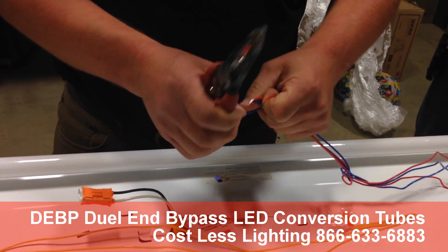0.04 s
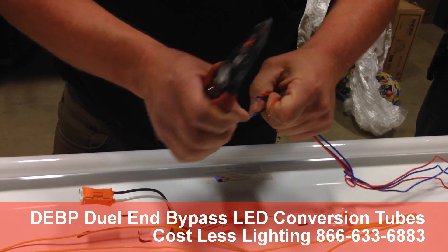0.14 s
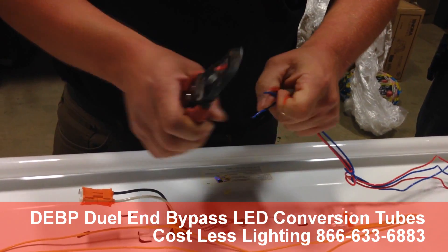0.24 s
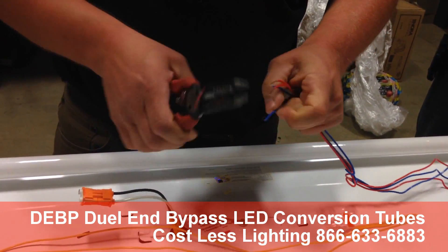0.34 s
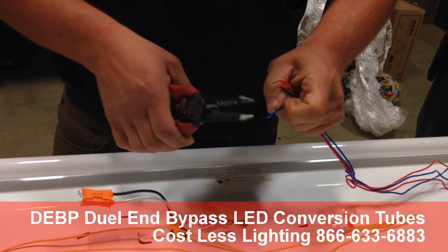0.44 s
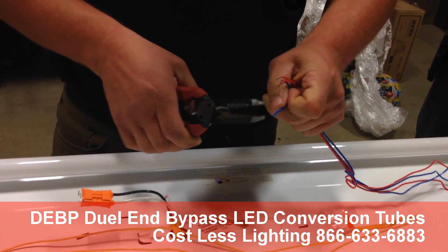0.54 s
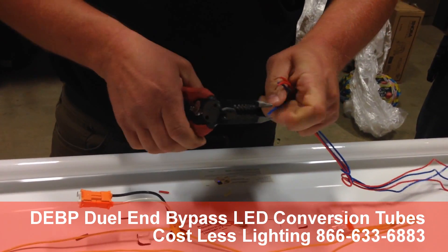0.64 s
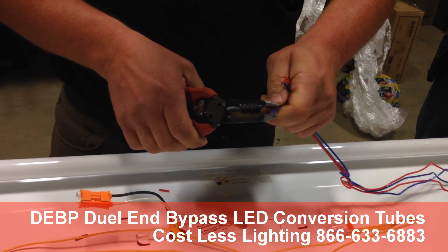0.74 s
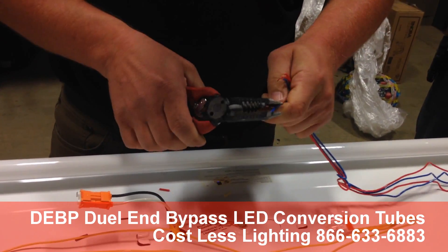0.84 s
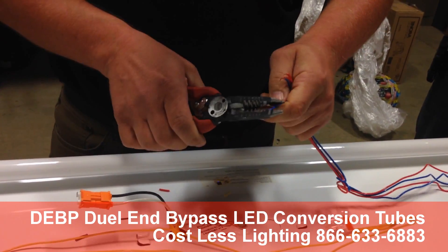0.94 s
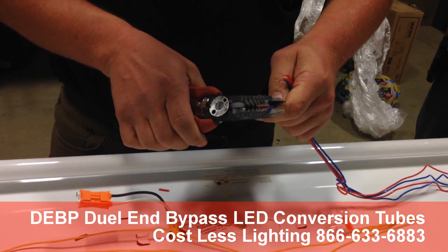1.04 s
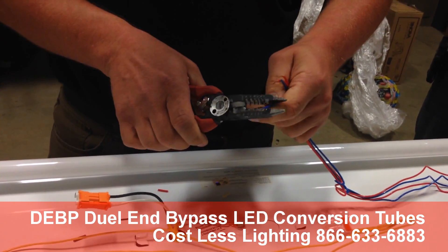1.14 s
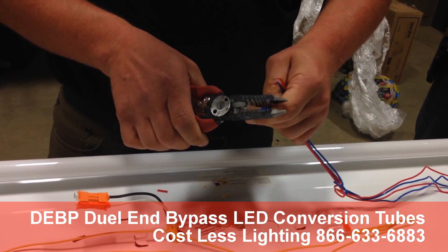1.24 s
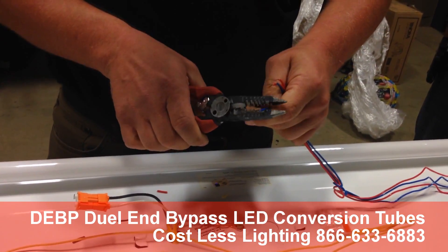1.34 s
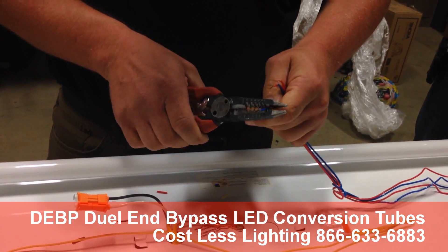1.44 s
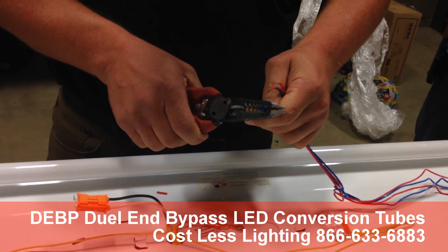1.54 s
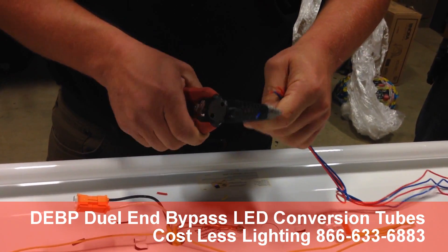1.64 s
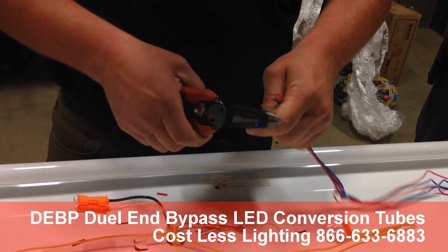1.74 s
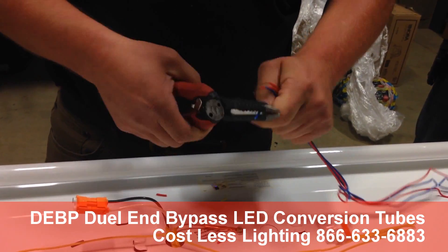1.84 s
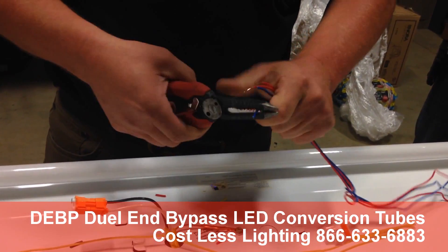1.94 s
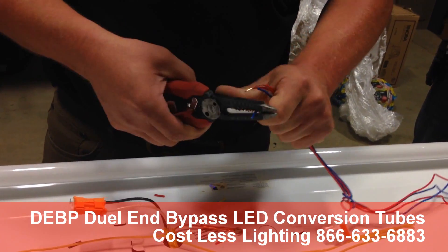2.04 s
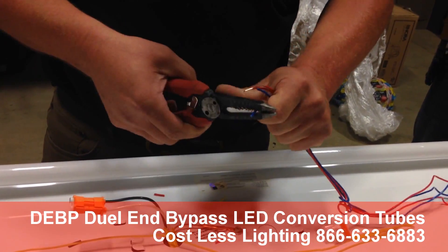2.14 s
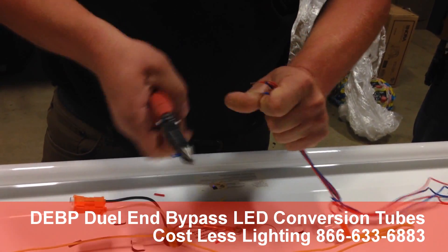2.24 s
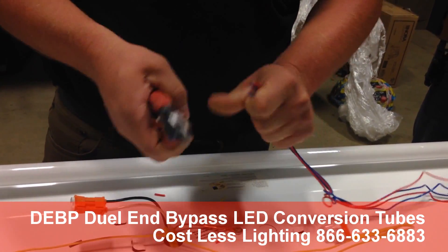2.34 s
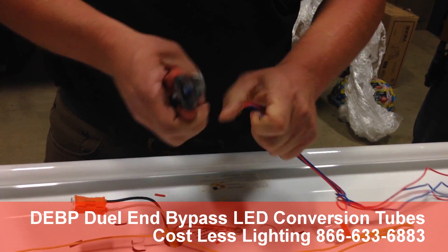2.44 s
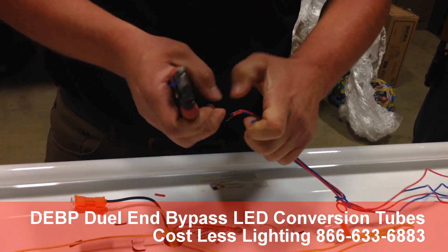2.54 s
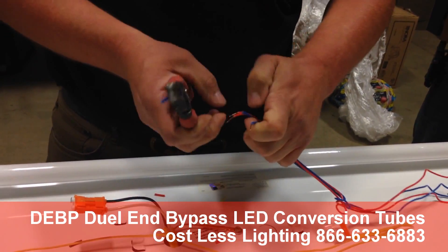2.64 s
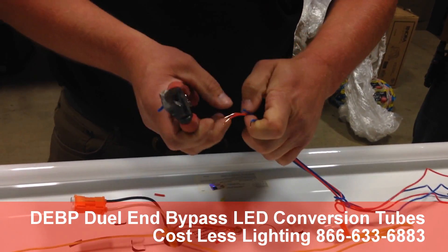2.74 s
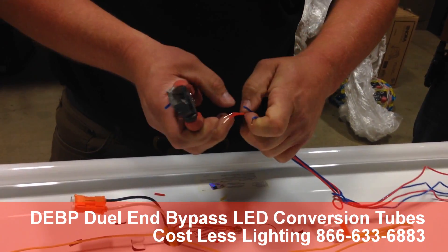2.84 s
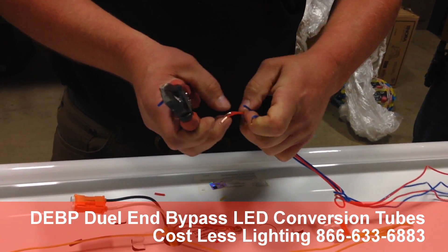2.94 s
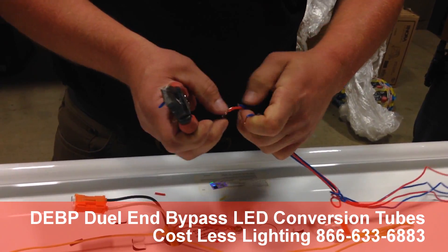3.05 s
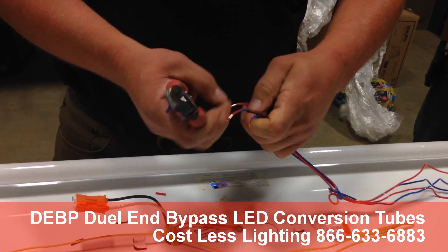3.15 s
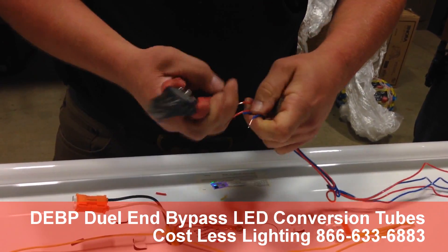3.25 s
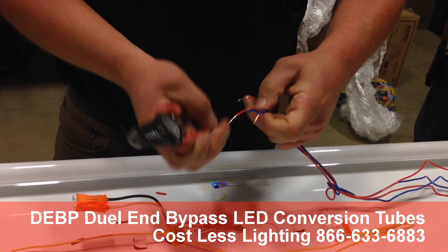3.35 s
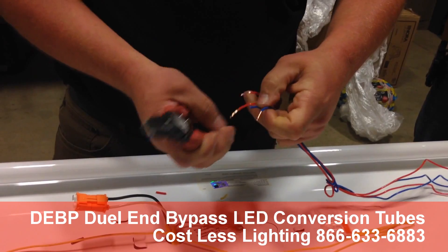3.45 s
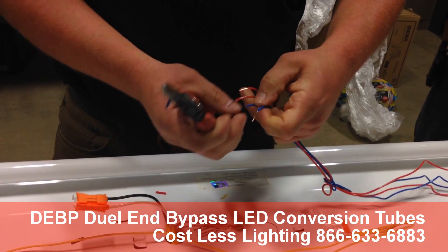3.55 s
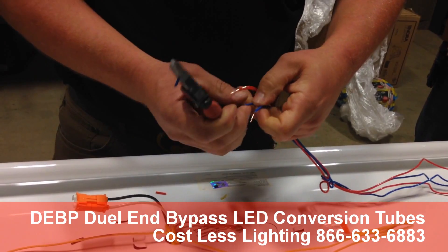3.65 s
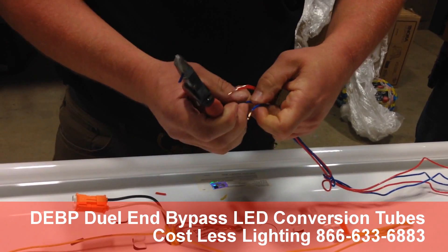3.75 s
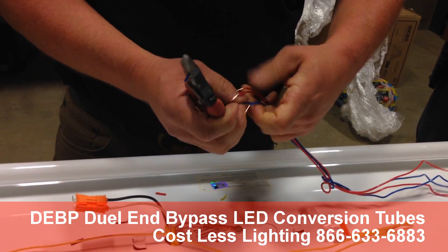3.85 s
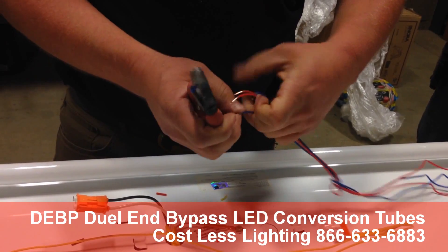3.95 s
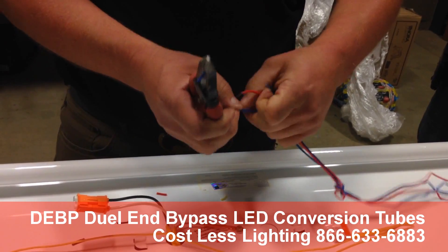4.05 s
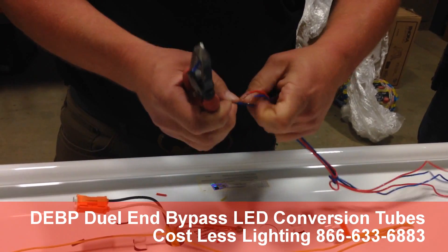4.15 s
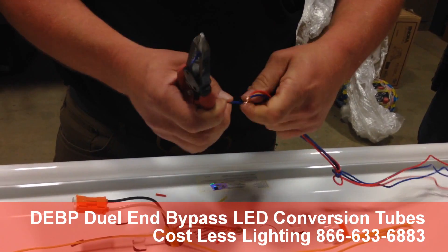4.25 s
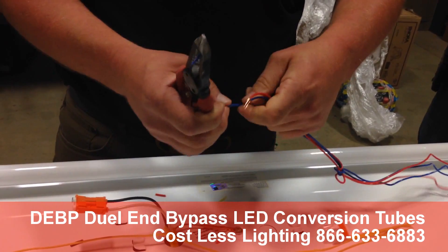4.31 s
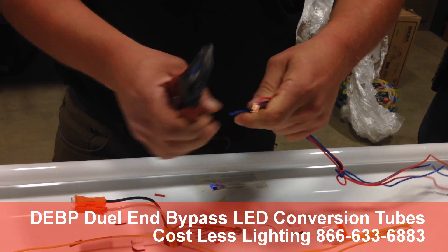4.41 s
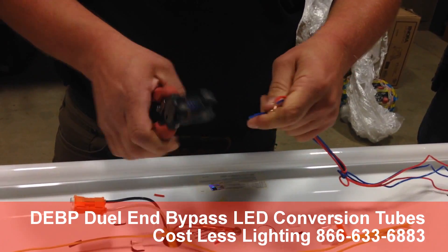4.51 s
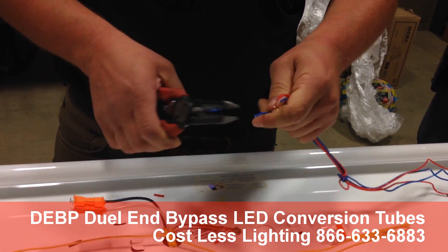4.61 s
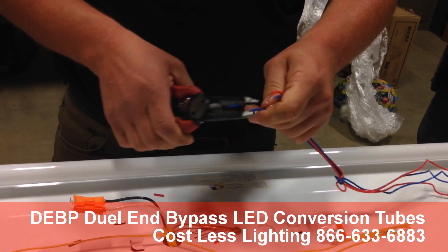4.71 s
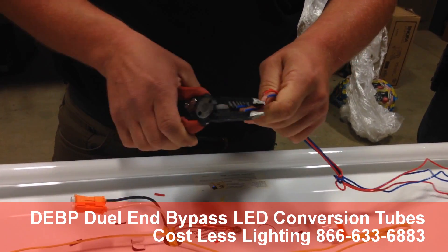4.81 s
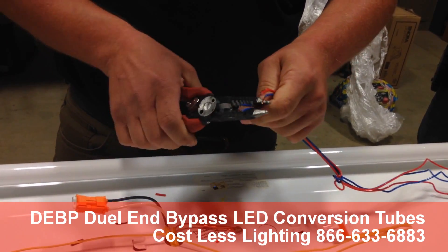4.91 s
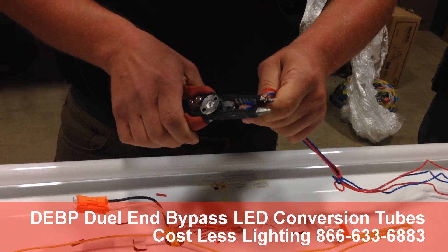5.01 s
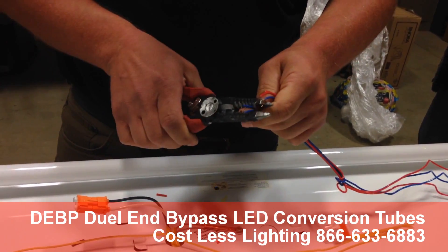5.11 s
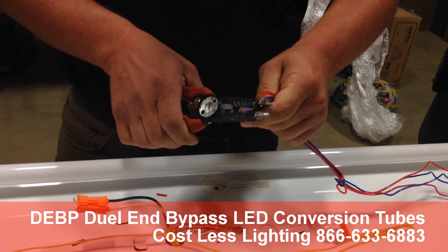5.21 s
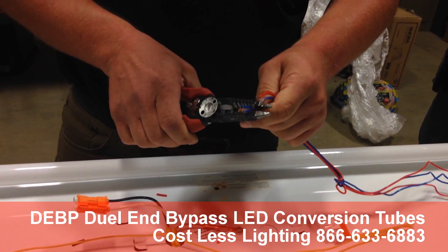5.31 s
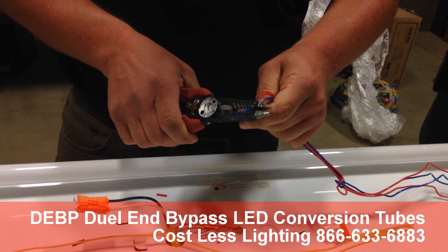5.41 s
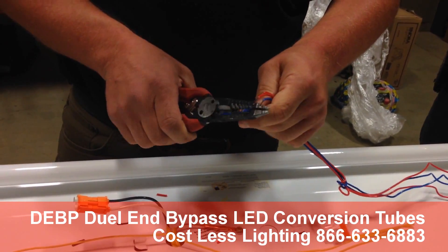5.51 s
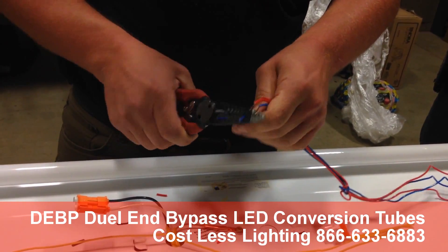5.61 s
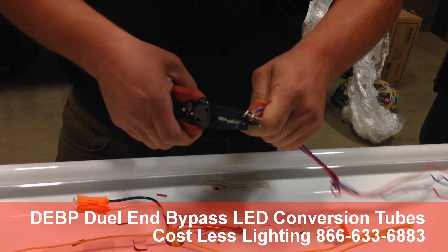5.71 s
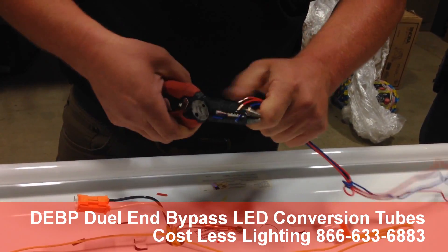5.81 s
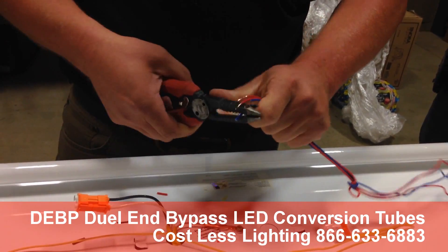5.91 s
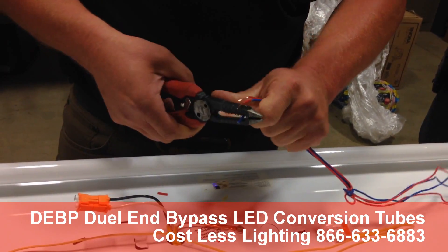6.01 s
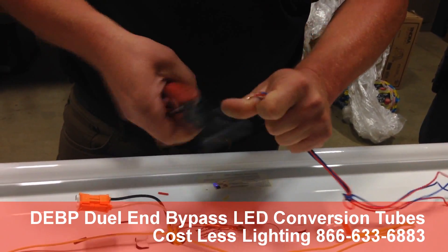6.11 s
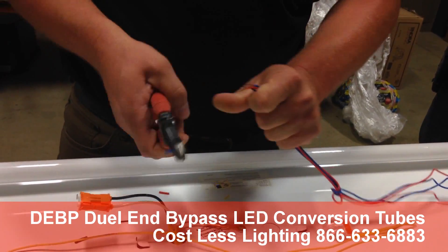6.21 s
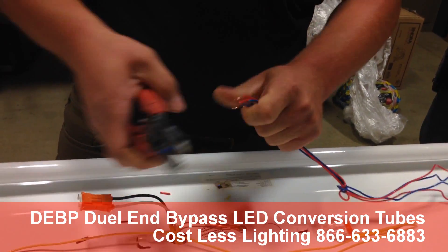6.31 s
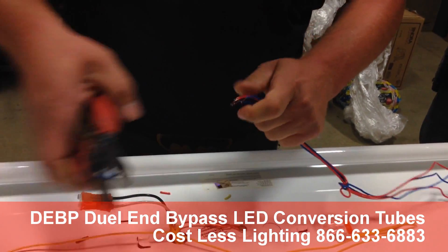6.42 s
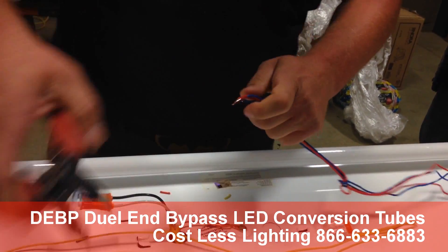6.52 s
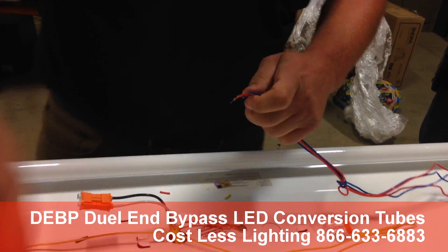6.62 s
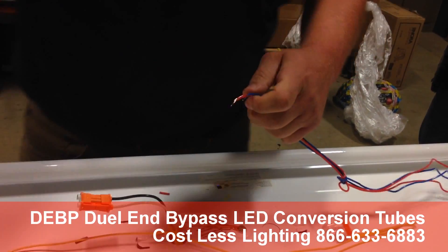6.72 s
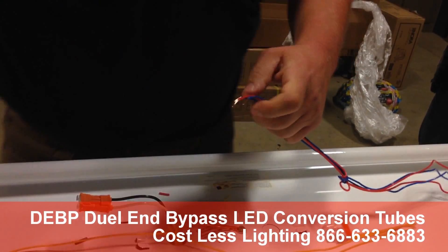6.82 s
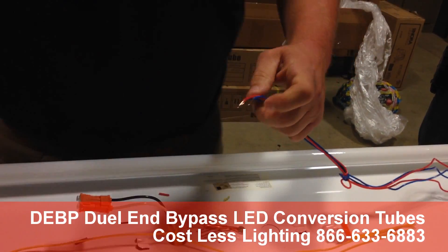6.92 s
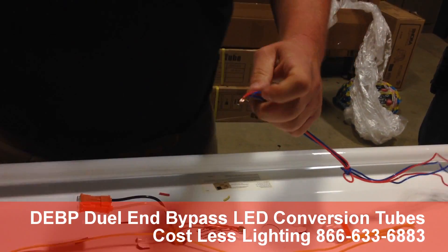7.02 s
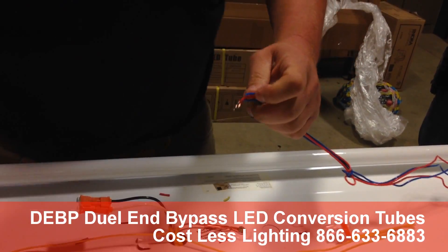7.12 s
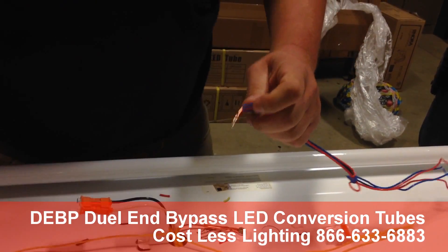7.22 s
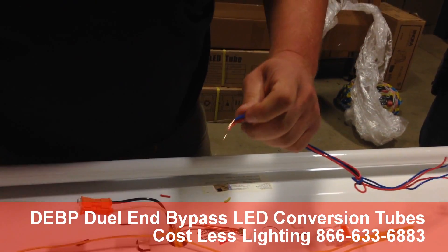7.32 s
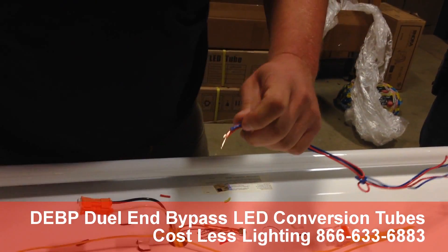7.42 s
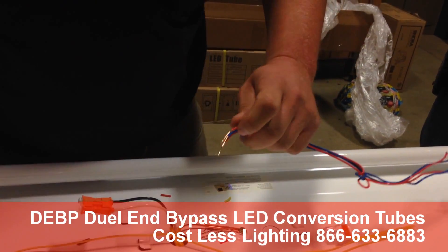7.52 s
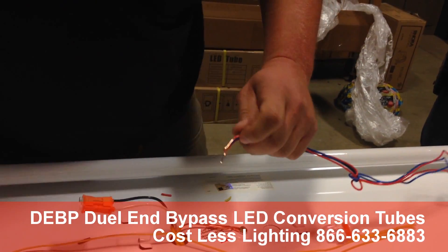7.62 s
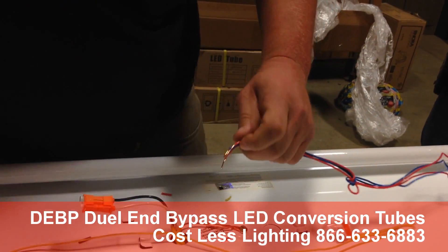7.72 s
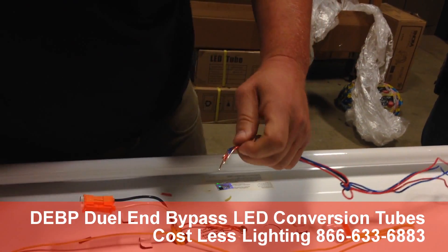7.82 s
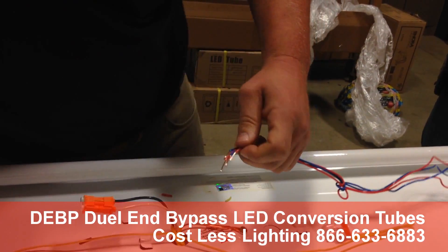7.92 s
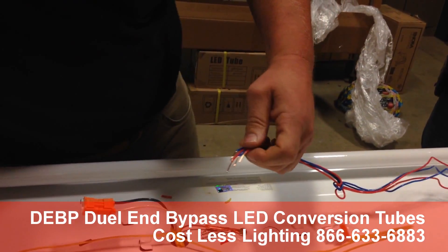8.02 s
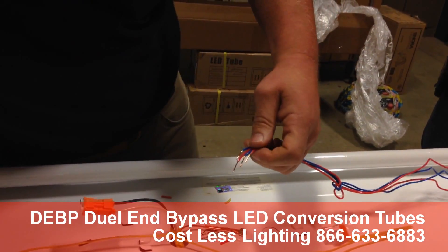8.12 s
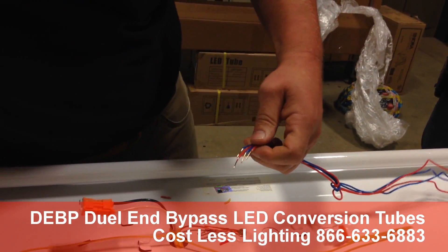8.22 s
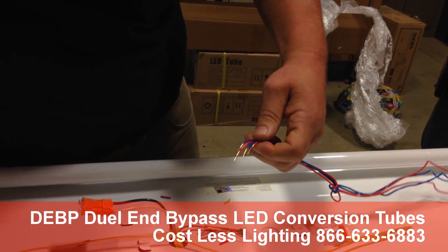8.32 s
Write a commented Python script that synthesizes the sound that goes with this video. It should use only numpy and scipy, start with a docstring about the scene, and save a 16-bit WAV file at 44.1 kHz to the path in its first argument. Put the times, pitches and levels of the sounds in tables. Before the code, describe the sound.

In a quiet store room with a short echo, irregular tool snaps alternate with near-silent handling. Two stripping actions each finish in a hard crack, a rattle and a dull boom of thin sheet metal. Wire ends brush and tick on the sheet. A brief shuffle of steps leads to a heavy woody clatter as the tool is put down, then sparse ticks and a final cluster of snaps, closely miked over faint air noise and hiss.

```python
"""Small ticks, rattles and hard snaps of hand wire strippers ring over a sheet-metal lamp housing in a store room.
Wire ends scrape the sheet, which booms when pushed; later steps rumble and the tool knocks on a wooden bench.
Ticks, rattles, snaps and cracks are shaped noise bursts; booms and knocks use fading sine waves.
Scrapes and steps are noise with a changing level. Ventilation noise, mains hum and microphone hiss run throughout."""
import sys
import numpy as np
from scipy import signal
from scipy.fft import rfft, irfft, next_fast_len
from scipy.io import wavfile
from scipy.ndimage import map_coordinates

SR = 44100
rng = np.random.default_rng(int(sys.argv[2]) if len(sys.argv) > 2 else 0)


def store_pcm(level_fs):
    """Save levels as 16-bit WAV."""
    pcm = np.round(np.clip(level_fs, -1, 1) * 32767).astype(np.int16)
    wavfile.write(sys.argv[1], SR, np.atleast_2d(pcm).T)


N = 368676


def amp(db):
    """Turn a level in dB into a gain."""
    return 10 ** (np.asarray(db) / 20)


def unit(x):
    """Scale x to rms 1."""
    return x / np.sqrt(np.mean(x ** 2) + 1e-20)


def along(points, hz):
    """Read a (frequency [Hz], value) table with straight lines on a log frequency axis."""
    f, value = np.transpose(points)
    return np.interp(np.log(hz + 1), np.log(f + 1), value)


def gain_curve(rows):
    """Turn a (time [s], level [dB]) table into a gain per sample, practically silent outside it."""
    s, db = np.transpose(rows)
    return amp(np.interp(np.arange(N) / SR, s, db, left=-200, right=-200))


def wobble(rate):
    """Draw a smooth random curve through `rate` random points a second."""
    points = rng.standard_normal(int(N * rate / SR) + 4)
    return map_coordinates(points, [np.arange(N) * rate / SR])


def filtered(x, response):
    """Filter x by multiplying its spectrum with a complex response of frequency."""
    n = x.shape[-1]
    m = next_fast_len(n + 8192)  # spare room for the filter to ring out
    spectrum = rfft(x, m) * response(np.fft.rfftfreq(m, 1 / SR))
    return irfft(spectrum, m)[..., :n]


def noise(colour):
    """Make steady noise of rms 1 whose spectrum follows a colour table."""
    white = rng.standard_normal(N)
    return unit(filtered(white, lambda hz: amp(along(colour, hz))))


def band(x, lo_hz, hi_hz):
    """Causal band-pass; white noise of rms 1 stays near rms 1."""
    sos = signal.butter(2, [lo_hz, hi_hz], "bandpass", fs=SR, output="sos")
    return signal.sosfilt(sos, x) * np.sqrt(SR / 2 / (hi_hz - lo_hz))


def resonance(hz, centre_hz, width_hz):
    """Response of one damped vibration: a causal peak of gain 1."""
    return 1j * hz * width_hz / (centre_hz ** 2 - hz * hz + 1j * hz * width_hz)


def place(times, sounds):
    """Add each row of sounds at its start time."""
    out = np.zeros(N + sounds.shape[1])
    for s, sound in zip(times, sounds):
        out[round(s * SR):][:len(sound)] += sound
    return out[:N]


def background():
    """Ventilation is coloured noise whose level flutters; the mains hum is a sine that wavers."""
    # ventilation spectrum: (frequency [Hz], relative level [dB per Hz])
    air_colour = [(15, -58.5), (25, -23.5), (36, -13), (64, 2), (122, -2.5), (192, -8), (308, -14.5),
                  (386, -16.5), (447, -19.5), (1200, -27.5), (1560, -79.5), (2640, -120)]
    # mains hum: (frequency [Hz], middle rms level [dB])
    hum_tones = [(119.5, -70.5)]
    t = np.arange(N) / SR
    air_db = -65 + 0.18 * wobble(22.0) + 0.86 * wobble(28)
    air = amp(air_db) * noise(air_colour)
    hum = np.zeros(N)
    for hz, db in hum_tones:
        level = np.sqrt(2) * amp(db + 1.4 * wobble(46))  # root 2 turns rms into peak
        hum += level * np.sin(2 * np.pi * hz * t + 0.39 * wobble(0.87))
    return air + hum


def housing(hz):
    """Response of the metal sheet: a few resonances added with alternating signs."""
    # sheet resonances: (centre [Hz], width [Hz], gain [dB])
    sheet_modes = [(2020, 720, -3.5), (3264, 240, 8.5), (3700, 950, -4.5)]
    total = 0
    for k, (centre_hz, width_hz, db) in enumerate(sheet_modes):
        total = total + (-1) ** k * amp(db) * resonance(hz, centre_hz, width_hz)
    return total


def ticks():
    """Offcuts and wire ends give a short click that rings one narrow resonance and the sheet below."""
    # ticks, starting 1 ms before the time: (time [s], level [dB], ring [Hz], 60 dB fade of the noise [s])
    tick_rows = [(0.0508, -55.5, 3200, 0.13), (0.2096, -59, 3260, 0.093), (0.3524, -37, 5200, 0.037),
                 (0.4234, -65, 2530, .035), (1.154, -60, 3060, 0.083), (2.3439, -42, 3200, 0.13),
                 (2.5005, -48, 2090, 0.11), (2.5596, -40.5, 3220, 0.15), (2.7637, -47, 6500, 0.041),
                 (4.013, -60, 3250, 0.072), (4.1682, -45, 2540, 0.065), (4.2314, -49, 2140, .07),
                 (4.2946, -41, 3256, 0.16), (4.391, -58, 3270, 0.065), (4.4685, -52, 3270, 0.045),
                 (4.56, -57, 2300, 0.076), (5.249, -64, 3400, 0.077), (5.7675, -63, 5840, 0.044),
                 (5.924, -55.5, 3180, 0.078), (5.9646, -52.5, 3170, 0.18), (6.0637, -51.5, 3400, 0.12),
                 (6.317, -45, 3150, 0.053), (6.35, -44.5, 3100, .1), (6.427, -46.5, 2020, 0.068),
                 (6.499, -51, 3080, 0.11), (6.547, -60.5, 3250, 0.079), (6.639, -56.5, 3160, 0.086),
                 (6.684, -52, 3200, .05), (6.8154, -52.5, 3120, 0.084), (6.893, -59, 3100, .07),
                 (6.986, -59.5, 2420, 0.3), (7.2638, -45.5, 4240, 0.031), (7.529, -52, 3170, 0.18),
                 (7.648, -56, 3170, .07), (7.9965, -56, 3010, 0.15), (8.103, -53, 5900, 0.061),
                 (8.2185, -56, 3170, 0.16), (8.2679, -42.5, 1820, 0.088)]
    s, db, hz, t60 = np.transpose(tick_rows)[:, :, None]
    t = np.arange(SR // 6) / SR
    grit = rng.standard_normal((len(s), len(t)))
    grit = grit * amp(-60 * t / t60) * (1 - np.exp(-t / 0.00011))
    width_hz = .16 * hz * (hz / 3200) ** .8  # higher rings are wider
    ring = amp(15) * filtered(grit, lambda f: resonance(f, hz, width_hz) ** 2)
    click = band(grit * amp(-60 * t / 0.093), 1200, 6700)
    click = click + amp(10.5) * filtered(grit, housing)
    return place(s[:, 0] - .001, amp(db) * (ring + amp(-7.5) * click))


def room(x):
    """Diffuse echo: each third of a second gets a new noise tail; each frequency dies at its own speed."""
    # room echo: (frequency [Hz], 60 dB fade [s])
    echo_times = [(100, 0.62), (500, 0.63), (2000, 0.32), (6000, 0.15), (14000, 0.18)]
    hop = SR // 3
    parts = np.pad(x, (0, -N % hop)).reshape(-1, hop)
    hz, t, z = signal.stft(rng.standard_normal((len(parts), SR // 2)), SR, nperseg=256)
    fade = amp(-60 * t / along(echo_times, hz)[:, None])
    tails = signal.istft(z * fade, SR, nperseg=256)[1]
    tails = tails / np.linalg.norm(tails, axis=1, keepdims=True)
    starts = np.arange(len(parts)) * hop / SR + 0.0073  # the echo starts 7.3 ms late
    return place(starts, signal.fftconvolve(parts, tails, axes=1))


def burst(rows, width, body_db, t60, rise, grit_db):
    """Gritty noise dying away, its treble first, around one broad resonance with a low and a high shoulder."""
    s, db, hz, treble_db = np.transpose(rows)[:, :, None]
    t = np.arange(SR // 3) / SR
    # the grit takes a new random level every 30 samples
    grit_levels = rng.standard_normal((len(s), len(t) // 30)).repeat(30, axis=1)
    grit = rng.standard_normal((len(s), len(t))) * amp(grit_db * grit_levels)
    hold_s = 0.009  # the fade starts after this time

    def fade(speed):
        """Let the grit build up, then die away; higher speeds die sooner."""
        return grit * (1 - np.exp(-t / rise)) * amp(-60 * speed * np.maximum(t - hold_s, 0) / t60)

    width_hz = hz * width

    def centre_response(f):
        """Double resonance with its far treble softened."""
        return resonance(f, hz, width_hz) ** 2 / (1 + 1j * f / (4.8 * hz)) ** 2

    centre = filtered(fade(0.91), centre_response) * np.sqrt(SR / width_hz / 2)
    body = amp(body_db) * band(fade(0.49), 830, 1550)
    treble = amp(treble_db) * band(fade(1.7), 4600, 12000)
    return place(s[:, 0] - .001, amp(db) * (centre + body + treble))  # starts 1 ms before the table time


def rattles():
    """Many small contacts of wires and handles, heard as noise building up over a few milliseconds."""
    # soft-starting rattles: (time [s], level [dB], centre [Hz], treble [dB])
    rattle_rows = [(0.394, -45.5, 2830, 1.5), (0.7154, -51, 4870, 0.5), (0.7548, -58, 5470, -9),
                   (0.9507, -60, 3100, -1), (1.6257, -56, 2100, -0.5), (1.6508, -63.5, 2350, 3),
                   (1.865, -55.5, 3000, -33), (2.0487, -63.5, 2440, -17), (2.1784, -58.5, 2720, -28),
                   (2.3094, -45, 2420, -9), (2.3745, -48.5, 2270, -2.5), (2.4023, -48, 3050, -30),
                   (2.4274, -64, 3080, -9), (2.72, -64.5, 2080, -17), (3.422, -63.5, 3200, 0),
                   (4.2468, -50, 2470, -29), (4.3185, -53.5, 2470, -2), (6.1974, -37, 2920, 1.5),
                   (6.22, -45, 2350, 10), (6.2791, -44, 2930, -22), (6.3695, -50.5, 2850, -31),
                   (7.034, -28, 4810, -44), (7.0556, -34, 3940, -22), (8.0605, -50, 3900, -7.5)]
    # width is relative to the centre; t60 [s] is the fade at speed 1; rise is in seconds
    return burst(rattle_rows, width=1.86, body_db=-16.5, t60=0.12, rise=0.0064, grit_db=4.5)


def snaps():
    """A hard contact of jaws and wire, then the dense reflections of sheet and bench, as one noise burst."""
    # hard snaps: (time [s], level [dB], centre [Hz], treble [dB])
    snap_rows = [(0.5654, -31.5, 4100, 0.5), (0.651, -40.5, 5040, -28), (0.8582, -44.5, 3450, -9),
                 (1.7888, -40, 3600, -45), (1.9752, -41.5, 2720, -10), (2.2871, -34.5, 3000, -25),
                 (2.574, -42, 2530, -44), (3.1657, -45.5, 2600, -17), (4.0445, -36, 3600, -46),
                 (4.0753, -40, 2830, -34), (4.135, -31.5, 3100, -51), (5.7347, -51, 2310, -10),
                 (5.8522, -45.5, 2900, -14), (6.0916, -28, 4244, -2.5), (8.0359, -36, 1963, -8.5),
                 (8.2901, -33, 2270, -41), (8.3174, -38.5, 1710, -22)]
    # same units as the rattles; quicker start, wider band, weaker body, faster fade, less grit
    return burst(snap_rows, width=2.1, body_db=-26.5, t60=0.11, rise=.0015, grit_db=2)


def scrape():
    """Friction hisses in uneven grains; sparse snags of the wire ends ring the sheet."""
    # wires dragging over the sheet, one list per drag: (time [s], level before mixing [dB])
    drags = [
        [(2.27, -60), (2.454, -55), (2.7, -70)],
        [(3.18, -76), (3.3, -62.5), (3.39, -74)],
        [(4.1, -62), (4.21, -51.5), (4.45, -72.5)],
        [(6.2, -54), (6.85, -66), (7.0, -64)],
        [(7.25, -82), (7.334, -63.5), (7.5, -77.5)],
    ]
    # friction spectrum: (frequency [Hz], relative level [dB per Hz])
    rub_colour = [(150, -43), (330, 7), (480, -19), (800, 4), (1560, -6), (3190, -1.5), (9000, -8),
                  (15000, -50)]
    snags_per_s = 220  # on average
    grain = amp(1.5 * wobble(250) + 2.2 * wobble(40))
    drag = sum(gain_curve(rows) for rows in drags)
    rub = drag * unit(grain * noise(rub_colour))
    snags = (rng.random(N) < snags_per_s / SR) * rng.standard_normal(N)
    snags = snags * amp(2 * rng.standard_normal(N))  # uneven strengths
    snag_ring = drag * unit(filtered(snags, housing))
    return amp(-3.5) * rub + amp(-2.5) * filtered(rub, housing) + amp(-9.5) * snag_ring


def booms():
    """A soft push sets one low vibration of the sheet going: a fading sine."""
    # pushes on the sheet: (time [s], level [dB])
    pushes = [(2.28, -64), (2.327, -51), (6.192, -54), (6.255, -45.5)]
    boom_hz = 206
    s, db = np.transpose(pushes)[:, :, None]
    t = np.arange(SR // 3) / SR
    envelope = amp(db - 60 * t / 0.22) * (1 - np.exp(-t / 0.0085))
    return place(s[:, 0], envelope * np.sin(2 * np.pi * boom_hz * t))


def cracks():
    """Dry cracks, loudest as the jaws slip off the wire and clap shut: brief broad noise over a dull push."""
    # cracks, starting 0.6 ms before the time: (time [s], level [dB])
    crack_rows = [(2.2826, -23), (2.2892, -30), (2.4695, -46), (4.4774, -49), (6.193, -25.5), (6.2043, -32),
                  (8.191, -51), (8.3039, -42)]
    s, db = np.transpose(crack_rows)[:, :, None]
    t = np.arange(SR // 10) / SR
    grit = rng.standard_normal((len(s), len(t)))
    short = grit * amp(-60 * t / 0.014)
    edge = band(short, 1620, 4700) + amp(-5.5) * band(short, 4100, 12000)
    push = amp(-19.5) * band(grit * amp(-60 * t / 0.043), 133, 420)
    return place(s[:, 0] - .0006, amp(db) * (edge + push))


def steps():
    """The worker steps aside: lumpy low noise, the rumble through the floor boards."""
    # rumble loudness: (time [s], level [dB])
    step_levels = [(6.44, -78.5), (6.5, -68), (6.55, -55), (6.6, -51.5), (6.68, -51.5), (6.72, -59),
                   (6.85, -70), (7.03, -56)]
    # rumble spectrum: (frequency [Hz], relative level [dB per Hz])
    step_colour = [(30, -5), (60, -6), (100, 10), (180, -22), (500, -14.5), (900, -38.5)]
    lumps = amp(1.3 * wobble(42))
    return gain_curve(step_levels) * unit(lumps * noise(step_colour))


def ringing(modes, t, count):
    """Blows on one object ring its modes at new strengths; loose joints blur each pitch, the more the higher."""
    blur = 3e-5  # random phase step [radians per sample and Hz]
    scatter_db = rng.normal(0, 1.5, (count, len(modes), 1))
    drift = np.cumsum(rng.standard_normal((count, len(modes), len(t))), axis=2) * blur
    total = 0
    for k, (hz, db, t60) in enumerate(modes):
        level = amp(db + scatter_db[:, k] - 60 * t / t60)
        total = total + level * np.sin(2 * np.pi * hz * t + hz * drift[:, k])
    return total


def knocks():
    """Each blow rings the bench top and the handles; steel on wood cracks for a few cycles."""
    # blows of the tool on the bench; crack and handles are relative to the blow:
    # (time [s], level [dB], crack [dB], handle ring [dB])
    blows = [(7.037, -28, -26, 9.5), (7.054, -22.5, -29, 6), (7.1412, -9, -7.5, -19),
             (7.1591, -12.5, -11.5, -19.5), (7.251, -21, -12.5, -20.5), (8.036, -44.5, 5, 13.5),
             (8.291, -42, 1, 3), (8.304, -47, -17.5, 20.5), (8.318, -41, -15, 9)]
    # bench top vibrations: (frequency [Hz], relative level [dB], 60 dB fade [s])
    bench_modes = [(110.1, -11, 0.37), (153.4, 0, 0.13), (270, 3, 0.071), (428, 0.5, 0.056),
                   (495, -11.5, 0.14), (630, -3, 0.064), (724, -13, 0.18), (898, -10, 0.051),
                   (1050, -14.5, .08), (1560, -29.5, 0.032)]
    # tool handle vibrations: (frequency [Hz], relative level [dB], 60 dB fade [s])
    handle_modes = [(691, -2.5, .09), (860, -2, 0.11), (928, 5, 0.03), (1723, -6, 0.26), (2400, -13, .05),
                    (3510, -15, .05)]
    s, db, crack_db, handle_db = np.transpose(blows)[:, :, None]
    t = np.arange(SR // 2) / SR
    bench_ring = ringing(bench_modes, t, count=len(s))
    handle_ring = amp(handle_db) * ringing(handle_modes, t, count=len(s))
    rings = amp(-10.0) * (bench_ring + handle_ring)
    grit = rng.standard_normal((len(s), len(t)))
    thud = amp(-5.5) * band(grit * amp(-60 * t / 0.059), 110, 1180)
    contact = -amp(13) * np.sin(2 * np.pi * 2450 * t)
    contact = contact * amp(-60 * t / .007)
    crack = amp(6) * band(grit * amp(-60 * t / 0.021), 1700, 3500)
    crack = crack + amp(-2.5) * band(grit * amp(-60 * t / 0.013), 4000, 5400)
    clatter = amp(-17.5) * band(grit * amp(-60 * t / 0.24), 1700, 5400)  # loose parts shake on
    blow = rings + thud + amp(crack_db) * (contact + crack + clatter)
    return place(s[:, 0], amp(db) * (1 - np.exp(-t / 0.00028)) * blow)


def scene():
    """Mix tool, wires and bench near the microphone with the room around them."""
    small = ticks() + cracks()
    loose = rattles()
    loose = loose + amp(0.5) * filtered(loose, housing)  # loose wires lie on the sheet
    # little top treble reaches the microphone
    tool = filtered(snaps() + loose, lambda hz: 1 / (1 + 1j * hz / 9000))
    # the bench top radiates little deep bass
    bench = filtered(knocks(), lambda hz: (1j * hz / (70 + 1j * hz)) ** 2)
    far = room(amp(-9.0) * tool + amp(-14.5) * small + amp(-21.0) * bench)
    near = tool + small + bench + booms()
    return (near + far + scrape() + steps() + background())[None]


def record(dry):
    """The microphone adds its hiss; the hardest peaks are rounded off and the sound ends at 15.4 kHz."""
    # hiss spectrum: (frequency [Hz], relative level [dB per Hz])
    hiss_colour = [(530, -22), (900, -5.5), (1130, -3), (1510, 1), (2370, 1.5), (2550, 1.5), (3380, 3.5),
                   (4440, 2.5), (15200, -1.5)]
    hiss_db, top_hz = -68, 15400  # hiss rms before the treble ends; upper limit of the sound
    x = dry + amp(hiss_db) * noise(hiss_colour)
    x = x / (1 + np.abs(x / .8) ** 4) ** (1 / 4)  # peaks bend smoothly towards 0.8
    return filtered(x, lambda hz: hz < top_hz)


dry = scene()
out = record(dry)
store_pcm(out)
```